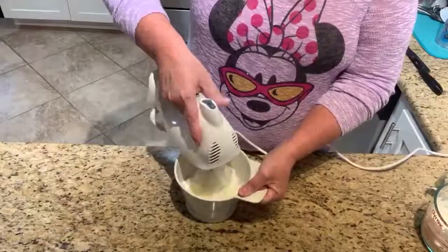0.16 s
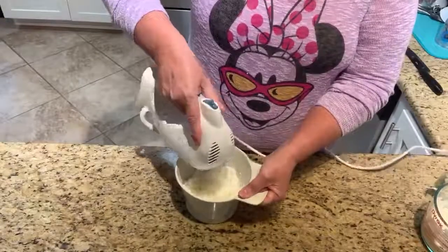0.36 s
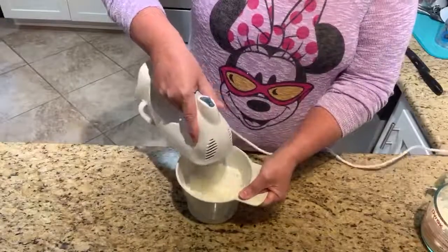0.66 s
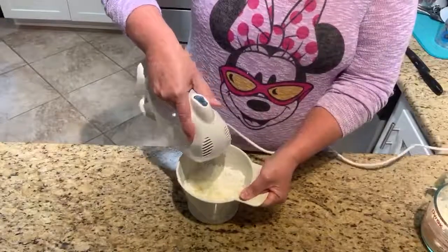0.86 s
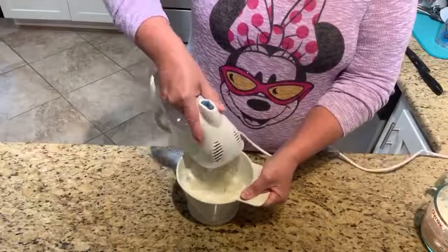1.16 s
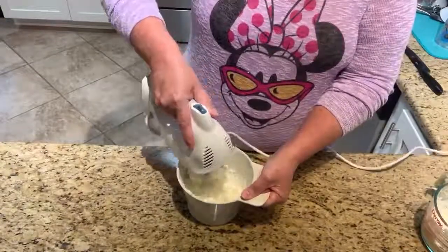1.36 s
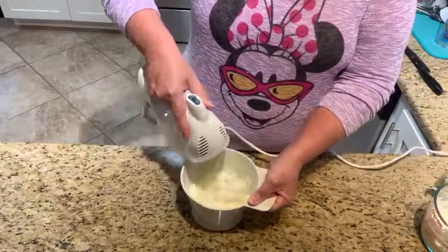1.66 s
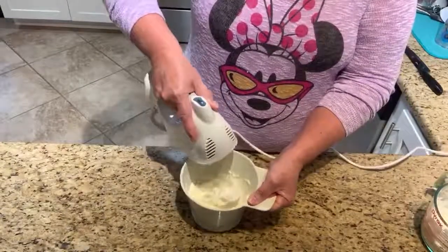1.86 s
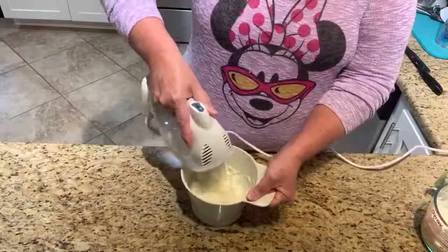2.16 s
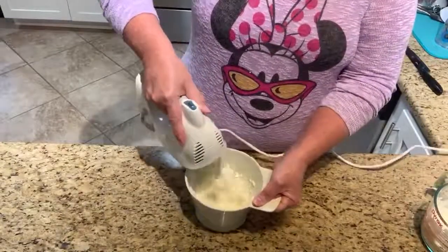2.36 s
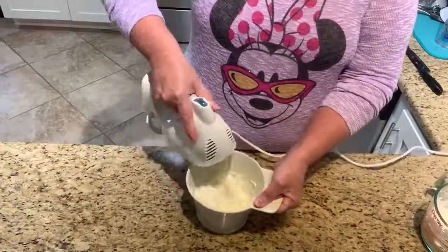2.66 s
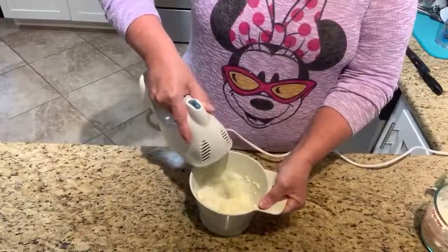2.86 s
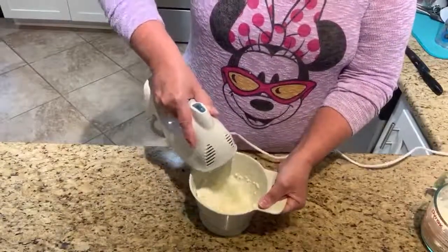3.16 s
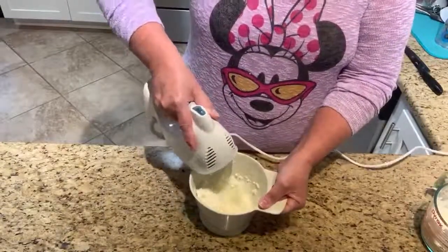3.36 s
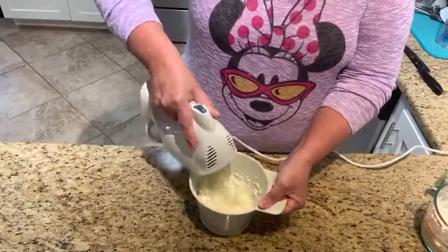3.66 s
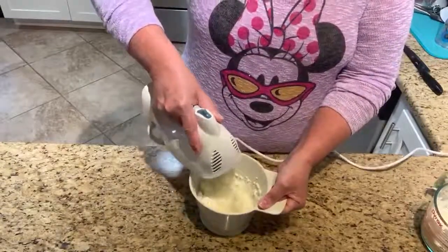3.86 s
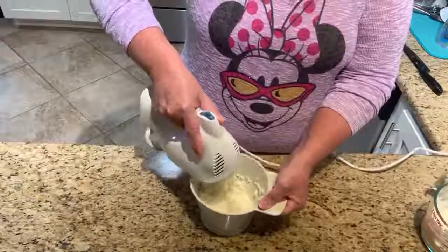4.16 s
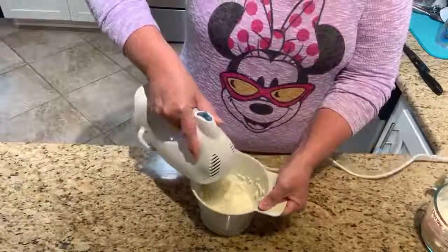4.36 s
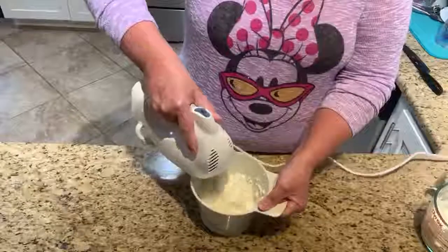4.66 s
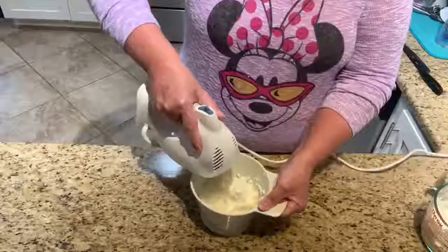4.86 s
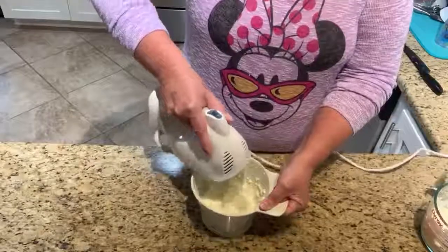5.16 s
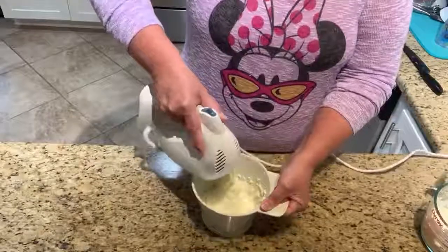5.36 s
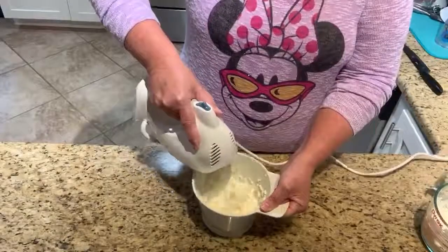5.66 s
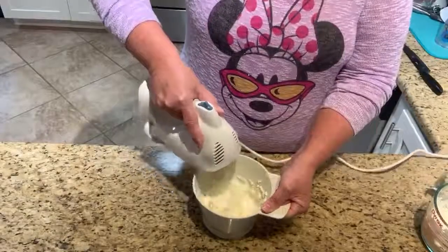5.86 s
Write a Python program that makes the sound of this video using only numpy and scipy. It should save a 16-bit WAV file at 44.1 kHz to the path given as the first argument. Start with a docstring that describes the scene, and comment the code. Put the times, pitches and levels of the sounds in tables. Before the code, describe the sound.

A handheld electric mixer runs continuously in a small bowl of soft batter. The motor quickly speeds up, then its nasal, buzzing whine wavers and sags under load, throbbing several times a second. Wet churning and rushing vent air lie beneath, with occasional plops, taps and faint scraping hiss late on. Close, dry, centred microphone in a kitchen, with little room sound.

```python
"""A steady, throbbing motor whine with a mains buzz: an electric hand mixer beats a soft mixture in a bowl, close by.
The motor whines at twelve times the shaft speed, sags under load and throbs once per beater turn.
Shaft orders whirr, whistle and form a faint treble comb, the motor iron hums and air rushes through the vents.
The beaters churn as shaped noise with tiny splashes; a few rubs are narrow hiss, plops and taps short ringing modes."""
import sys
import numpy as np
from scipy import signal
from scipy.fft import rfft, irfft
from scipy.io import wavfile
from scipy.ndimage import uniform_filter1d

SR = 44100
rng = np.random.default_rng(int(sys.argv[2]) if len(sys.argv) > 2 else 0)


def waveform_to_disk(signal):
    """Save audio, clipped to [-1, 1], as 16-bit WAV at the path in sys.argv[1]."""
    frames = np.transpose(np.atleast_2d(signal))
    scaled = np.clip(frames, -1, 1) * 32767
    samples = np.round(scaled).astype(np.int16)
    wavfile.write(sys.argv[1], SR, samples)


N = 264600
TIME = np.arange(N) / SR
PULSE_HZ = 120  # motor torque pulses, two per mains cycle
GEAR_RATIO = 28.58  # shaft turns per beater turn

# treble spectrum of vent fizz and comb, before housing peaks and ripple: (frequency [Hz], relative density [dB])
FIZZ_SPECTRUM = [(3000, -31), (6500, -5), (8800, 2), (10500, 0), (12300, -0.5), (14500, -4), (15700, -10)]


def gain_of(db):
    """Decibels to amplitude gain."""
    return 10 ** (np.asarray(db) / 20)


def evened(x):
    """Scales to rms 1."""
    return x / np.sqrt(np.mean(abs(x) ** 2) + 1e-20)


def curves(rows):
    """Each column after the time column, interpolated over all samples."""
    s, *columns = np.transpose(rows)
    return [np.interp(TIME, s, column) for column in columns]


def swell(s, length_s):
    """Gaussian bump of height 1 at time s; length is the full width at 1/e."""
    return np.exp(-2 * (np.sqrt(2) * (TIME - s) / length_s) ** 2)


def drift(rate_hz):
    """Smooth complex noise of about rms 1, rolled off above the given rate."""
    control_hz = 1000
    hz = np.fft.fftfreq(8192, 1 / control_hz)
    noise = rng.standard_normal((8192, 2)) @ [1, 1j]
    smooth = evened(np.fft.ifft(noise / np.sqrt(1 + (hz / rate_hz) ** 4)))
    return np.interp(TIME, np.arange(len(smooth)) / control_hz, smooth)


def line(turns, scatter, rate_hz):
    """A tone of about rms 1 that flutters at random in level and phase."""
    flutter = 1 + scatter * drift(rate_hz)
    angle = np.float32(2 * np.pi * (turns - np.floor(turns)))
    tone = flutter.real * np.cos(angle) - flutter.imag * np.sin(angle)
    return np.sqrt(2 / (1 + scatter ** 2)) * tone


def coloured(x, points, band, ripple_db):
    """Gives x a spectrum, resonance peaks and a random spectral ripple; rms 1 within the band [Hz]."""
    # housing and bowl resonances: (centre [Hz], width [Hz], peak [dB])
    housing = [(200, 19, 1.5), (386, 17, 1.5), (551, 17, -4), (688, 29, 4.5), (826, 23, 7), (903, 18, 4.5),
               (1160, 64, 3.5), (1500, 91, 1.5), (1780, 48, 6.5), (3010, 42, 4.5), (3516, 81, 4.5),
               (4740, 380, 3.5), (7600, 240, 1.5), (8140, 99, 6.5), (10580, 250, 4)]
    hz = np.fft.rfftfreq(N, 1 / SR)
    point_hz, point_db = np.transpose(points)
    db = np.interp(np.log(hz + 1), np.log(point_hz), point_db)
    for centre_hz, width_hz, peak_db in housing:
        db = db + peak_db / (1 + (2 * (hz - centre_hz) / width_hz) ** 2)
    db = db + ripple_db * evened(uniform_filter1d(rng.standard_normal(len(hz)), size=200))
    z = rfft(x) * gain_of(db)
    in_band = (hz > band[0]) * (hz < band[1])
    return irfft(z, N) / np.std(irfft(z * in_band, N))


def leaning():
    """0 while the beaters run free, 1 while they are leaned into the mixture."""
    from_s, to_s, ease_s = 2.0, 4.69, 0.054
    return .5 * (np.tanh((TIME - from_s) / ease_s) - np.tanh((TIME - to_s) / ease_s))


def throb(turns):
    """Gain that dips once per beater turn, about equally deep throughout; mean about 1."""
    dip_at_turns, depth_free, depth_leaning = 0.81, 0.37, 0.39
    depth = np.clip(depth_free + (depth_leaning - depth_free) * leaning(), 0, 1)
    dip = np.cos(np.pi * (turns / GEAR_RATIO - dip_at_turns)) ** 8
    return (1 - depth * dip) / (1 - depth * dip.mean())


def whine(turns, speed):
    """Twelve armature slots sing; torque pulses add buzz lines on both sides of the slot tone."""
    # whine, swelling and fading as the mixer is moved about, before surges: (time [s], level [dB])
    tone_levels = [(0.0, -36), (0.18, -26), (0.42, -29), (0.58, -26.5), (1.1, -27), (1.44, -36.5),
                   (2.3, -24.5), (2.48, -27.0), (3.56, -23.0), (3.76, -27.5), (4.04, -22), (4.34, -26.0),
                   (4.48, -47), (4.68, -23.5), (4.94, -34), (5.06, -32), (5.66, -42), (6.0, -26.5)]
    # lines one pulse rate away, before trims and surges: (time [s], lower level [dB], upper level [dB])
    inner_buzz = [(0.0, -31, -41), (0.08, -34.5, -28.5), (0.42, -27.5, -36.5), (0.88, -42, -30),
                  (0.98, -31, -32), (1.8, -32.5, -39), (2.16, -32, -29), (2.62, -37.5, -37.5),
                  (2.74, -33.5, -33), (3.58, -33.5, -35.5), (3.7, -48, -26.5), (4.3, -32, -34.0),
                  (4.5, -32.5, -20), (4.7, -30.5, -38), (5.02, -39.5, -29), (5.2, -32, -33.5),
                  (5.58, -32.0, -26.5), (6.0, -39.5, -34.5)]
    # lines further out: (multiple of pulse rate [1], level against the untrimmed inner line on that side [dB])
    outer_buzz = [(-3, -10), (-2, -6.5), (2, -17), (3, -36)]
    # brief dropouts and surges of whine and buzz: (time of peak [s], length [s], level change [dB])
    surges = [(0.118, 0.028, 6.5), (0.37, 0.12, -4), (0.633, 0.013, 5), (1.045, .06, 2.5),
              (2.538, 0.053, -9), (3.102, 0.024, -10), (3.205, 0.027, 4), (3.419, 0.051, -12),
              (3.642, 0.014, 6.5), (3.907, 0.044, 1.5), (4.07, 0.021, 3), (4.19, 0.024, 5),
              (4.228, 0.025, -8), (4.789, 0.013, -17)]
    inner_trims = [(-1, -0.28), (1, -0.78)]  # (multiple of pulse rate, dB)
    resonance_edge_hz = 2085
    lower_lag_turns = 0.26  # lower lines against upper: 0 = pure throb, .5 = pure warble

    slots, slot_hz = 12 * turns, 12 * speed
    tone_db, = curves(tone_levels)
    lower_db, upper_db = curves(inner_buzz)
    wobble_db = 1.8 * drift(rate_hz=24).real
    tone = gain_of(wobble_db) * line(slots, scatter=.26, rate_hz=20)
    out = gain_of(tone_db) * throb(turns) * evened(tone)
    for k, db in inner_trims + outer_buzz:
        # the lines' phase wanders at random: buzz turns from throb to warble and back
        lag = .17 * drift(rate_hz=2).real + (k < 0) * lower_lag_turns
        offset_hz = k * PULSE_HZ
        # the housing is quiet below its resonance
        radiated = 1 / np.sqrt(1 + (resonance_edge_hz / (slot_hz + offset_hz)) ** 60)
        level = radiated * gain_of(db + (lower_db if k < 0 else upper_db))
        out += level * line(slots + offset_hz * TIME + lag, scatter=.26, rate_hz=12)
    surge_db = sum(db * swell(s, length_s) for s, length_s, db in surges)
    return out * gain_of(surge_db)


def beaters(turns, speed):
    """Wet churning: noise and many tiny splashes, louder at speed and as each blade cuts the mixture."""
    # churn spectrum before housing peaks and ripple: (frequency [Hz], relative density [dB])
    spectrum = [(22, -40), (48, -33), (78, -16.5), (115, -10.5), (155, -16), (200, -9), (300, -3),
                (390, 1.5), (560, 3.5), (780, -1), (1150, 0.5), (1700, -2.5), (2600, -0.5), (5000, -21.5)]
    # brief swells of the churn; a row of 0 dB adds none: (time of peak [s], length [s], boost [dB])
    churn_swells = [(1.424, 0.068, 2.5), (2.457, .05, 3.5), (2.806, 0.022, 0)]
    cruise_turns_per_s, cruise_db, db_per_turn_per_s = 200, -37, 0.1
    splashes_per_s, blade_count = 500, 4

    chance, size = rng.random(N), np.minimum(rng.exponential(1, N), 4)
    splashes = (chance < splashes_per_s / SR) * gain_of(6.1 * size) * rng.choice([-1, 1], N)
    drive = rng.standard_normal(N) + 0.29 * evened(splashes)
    churn_db = cruise_db + db_per_turn_per_s * (speed - cruise_turns_per_s)
    churn_db = churn_db + sum(db * swell(s, length_s) for s, length_s, db in churn_swells)
    blades_db = 0.51 * np.sin(2 * np.pi * blade_count * turns / GEAR_RATIO)
    wander_db = 1.2 * drift(rate_hz=4.7).real
    churn = coloured(drive, spectrum, band=(520, 1900), ripple_db=1.52)
    return gain_of(churn_db + blades_db + wander_db) * churn


def vents():
    """Cooling air and its fizz, pulsing slightly at the torque pulse rate and fluttering together."""
    # air spectrum before housing peaks and ripple: (frequency [Hz], relative density [dB])
    air_spectrum = [(60, -48), (500, -20), (1500, -3), (2000, 1), (2350, 18), (2750, 0), (3400, 2),
                    (4100, -2), (5500, -3), (7500, -7), (10000, -26.5), (16000, -34)]
    pulse = np.cos(2 * np.pi * PULSE_HZ * TIME)
    flutter_db = .35 * drift(rate_hz=30).real
    air_db = -39.5
    fizz_db = -46.5 + 3 * swell(s=1, length_s=.1)  # one brief brightening
    air = coloured(rng.standard_normal(N) * (1 + .07 * pulse), air_spectrum, band=(3000, 6500), ripple_db=1.47)
    fizz = coloured(rng.standard_normal(N) * (1 + .05 * pulse), FIZZ_SPECTRUM, band=(8000, 15500), ripple_db=2.0)
    return gain_of(flutter_db) * (gain_of(air_db) * air + gain_of(fizz_db) * fizz)


def hum():
    """Motor iron hums at multiples of the torque pulse rate; leaning shifts weight to the highest."""
    # (multiple of pulse rate [1], level running free [dB], level leaning [dB])
    hum_lines = [(2, -55.5, -56.5), (3, -48, -57), (4, -48.5, -43.5)]
    lean = leaning()
    out = np.zeros(N)
    for k, free_db, leaning_db in hum_lines:
        level = gain_of(free_db + (leaning_db - free_db) * lean)
        out += level * line(k * PULSE_HZ * TIME + rng.random(), scatter=0.32, rate_hz=6.1)
    return out


def whirr(turns, speed):
    """Shaft orders, some whistling across resonances; torque pulses rock the shaft, splitting high ones most."""
    # shaft, commutator and gear lines: (multiple of shaft speed [1], level [dB])
    steady_lines = [(1, -60.5), (5, -53), (6, -58), (7, -54), (8, -58.5), (9, -56.5), (10, -52),
                    (16, -51.5), (24, -57), (36, -57.5), (48, -69), (52, -77), (53, -60), (60, -79),
                    (72, -73)]
    # orders crossing a resonance, level at its centre before pulsing:
    # (multiple of shaft speed [1], resonance [Hz], width [Hz], level [dB])
    whistles = [(7, 1372, 18, -47), (24, 4575, 190, -50), (24, 4760, 66, -61), (36, 7000, 310, -58),
                (36, 7330, 160, -58), (48, 10100, 230, -53.5), (60, 12420, 230, -56), (72, 14680, 250, -57)]
    rocked = turns + 0.0053 * np.sin(2 * np.pi * PULSE_HZ * TIME)
    steady, passing = np.zeros(N), np.zeros(N)
    for k, db in steady_lines:
        steady += gain_of(db) * line(k * rocked, scatter=1.0, rate_hz=12.3)
    for k, hz, width_hz, db in whistles:
        resonance = 1 / np.hypot(1, 2 * (k * speed - hz) / width_hz)
        passing += gain_of(db) * resonance * line(k * rocked, scatter=1.0, rate_hz=17)
    return steady + passing * (1 + 0.68 * np.cos(2 * np.pi * PULSE_HZ * TIME))


def treble_comb(turns):
    """A faint treble comb of shaft orders, each fading in and out at random."""
    comb = sum(line(k * turns, scatter=2, rate_hz=7) for k in np.arange(start=38, stop=76, step=2))
    return gain_of(-53.5) * coloured(comb, FIZZ_SPECTRUM, band=(8000, 15500), ripple_db=5.0)


def knocks():
    """Air pockets plop and beaters tap the bowl: each is one briefly ringing mode with a soft start."""
    # (onset [s], level before soft start and decay [dB], pitch [Hz], t60 [s])
    modes = [(1.098, -29.5, 567, 0.13), (2.452, -25, 1150, 0.036), (2.456, -27, 706, 0.078),
             (2.526, -22, 712, 0.069), (2.664, -21, 1680, 0.028), (3.865, -17, 1470, 0.018),
             (4.312, -31, 6050, .025), (4.566, -32, 6500, .02), (4.598, -28, 6900, 0.018)]
    out, t = np.zeros(N), np.arange(SR // 5) / SR
    for s, db, hz, t60_s in modes:
        soft_start = 1 - np.exp(-t / 0.00073)
        ring = gain_of(db - 60 * t / t60_s) * np.sin(2 * np.pi * hz * t) * soft_start
        out[round(s * SR):][:len(t)] += ring
    return out


def rubs():
    """Beater wire sliding on the bowl wall gives an uneven, narrow hiss."""
    # (time of peak [s], length [s], level before the uneven pressure [dB])
    strokes = [(4.3, 0.31, -48), (4.62, 0.23, -46), (5.3, 0.42, -47.5)]
    # hiss spectrum before housing peaks and ripple: (frequency [Hz], relative density [dB])
    spectrum = [(4000, -28), (5500, -8), (6100, 7), (6700, -3), (7500, -2), (8500, -20), (14000, -35)]
    pressure = sum(gain_of(db) * swell(s, length_s) for s, length_s, db in strokes)
    hiss = coloured(rng.standard_normal(N), spectrum, band=(4000, 9000), ripple_db=4.0)
    return pressure * abs(drift(rate_hz=42)) * hiss


def scene():
    """Shaft speed drives whine, whirr, comb and churn; one spot, so both channels are alike."""
    # sags under load and recovers: (time [s], shaft speed [turns/s])
    shaft = [(0.0, 179.8), (0.21, 203.4), (0.44, 205.4), (0.8, 190.2), (1.09, 192.5), (1.25, 206.0),
             (1.39, 209.6), (1.51, 204.9), (1.85, 209.1), (2.37, 197.5), (2.5, 198.7), (2.69, 194.4),
             (2.88, 199.7), (2.98, 196.5), (3.21, 195.7), (3.34, 198.7), (3.5, 198.0), (3.77, 190.8),
             (4.03, 198.1), (4.3, 190.6), (4.51, 187.6), (4.7, 191.2), (4.99, 208.5), (5.22, 211.2),
             (5.43, 202.5), (5.65, 202.2), (5.79, 208.2), (6.0, 208.9)]
    speed, = curves(shaft)
    turns = np.cumsum(uniform_filter1d(speed, size=2500, mode="nearest")) / SR
    spin_up_s = 0.049
    spin_up = gain_of(-9 * np.maximum(1 - TIME / spin_up_s, 0))
    motor = whine(turns, speed) + spin_up * (whirr(turns, speed) + hum() + treble_comb(turns) + vents())
    mix = motor + beaters(turns, speed) + rubs() + knocks()
    return np.array([mix, mix])


def record(dry):
    """Upper band limit: a steep linear-phase low-pass."""
    edge_hz = 15720
    low_pass = signal.firwin(1023, edge_hz, window=("kaiser", 9), fs=SR)
    return signal.oaconvolve(dry, low_pass[None], "same")


dry = scene()
out = record(dry)
waveform_to_disk(out)
```